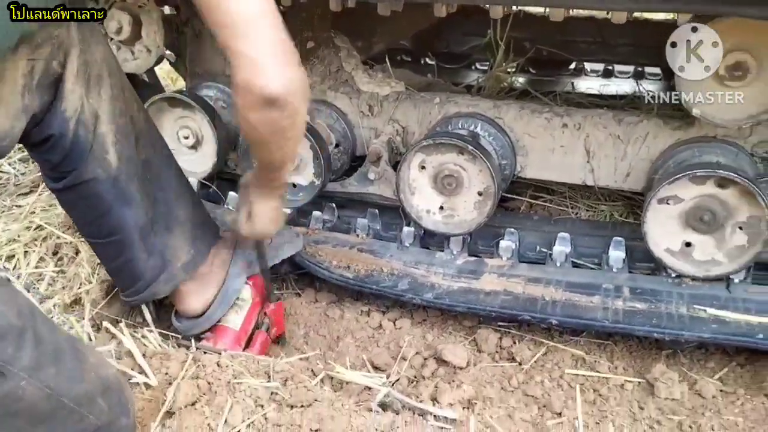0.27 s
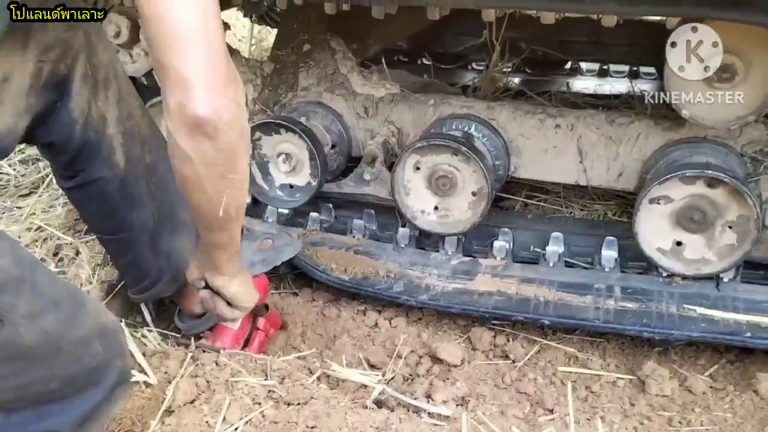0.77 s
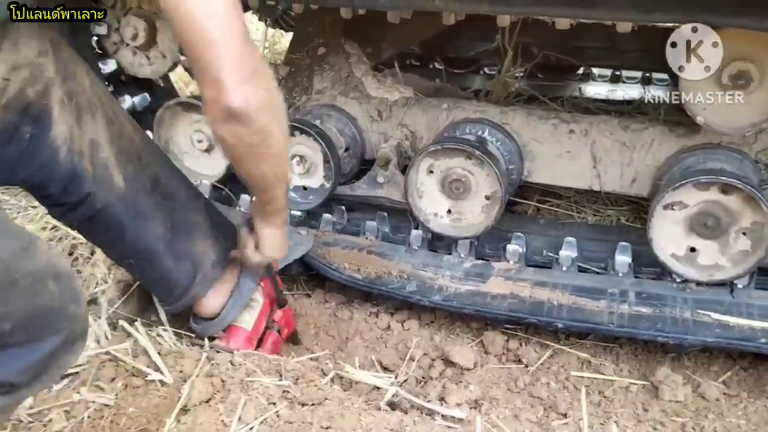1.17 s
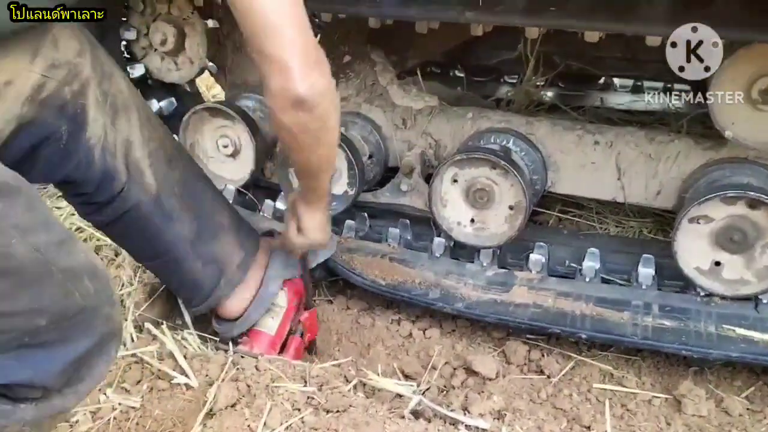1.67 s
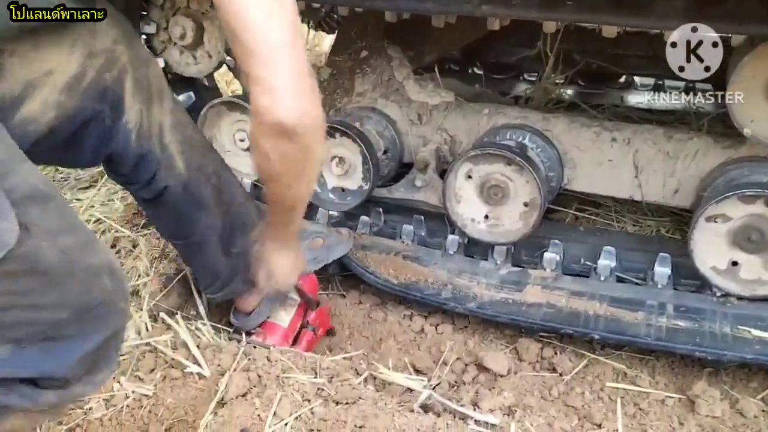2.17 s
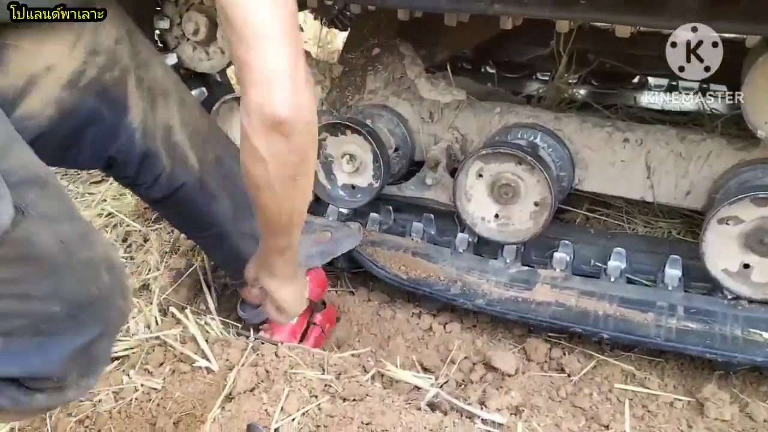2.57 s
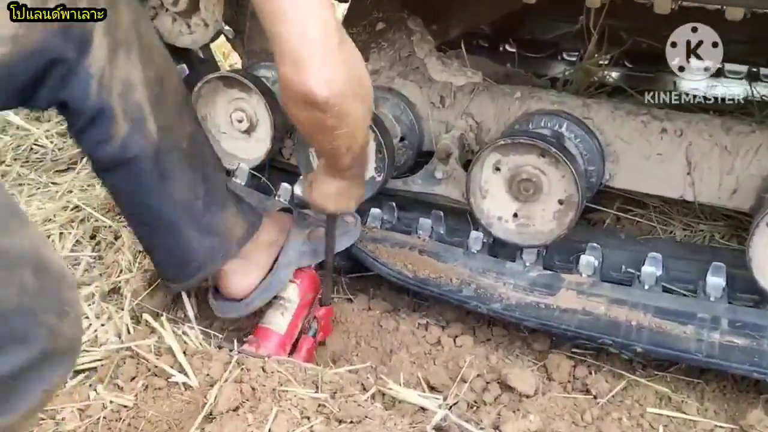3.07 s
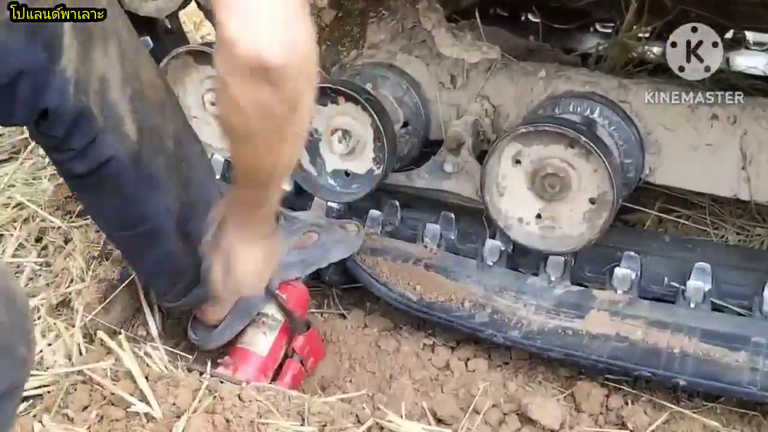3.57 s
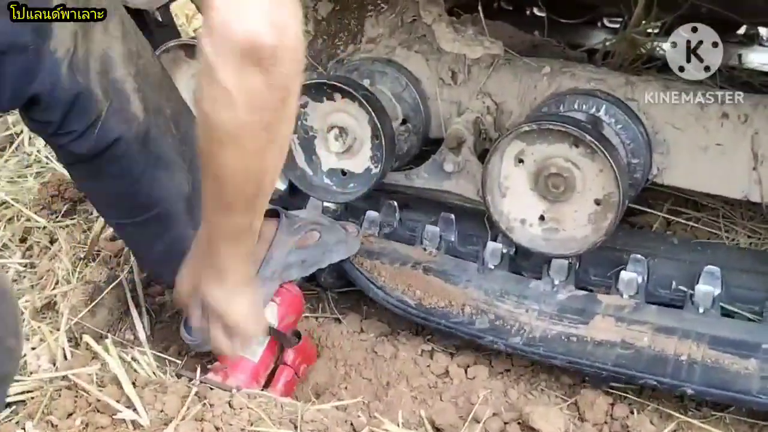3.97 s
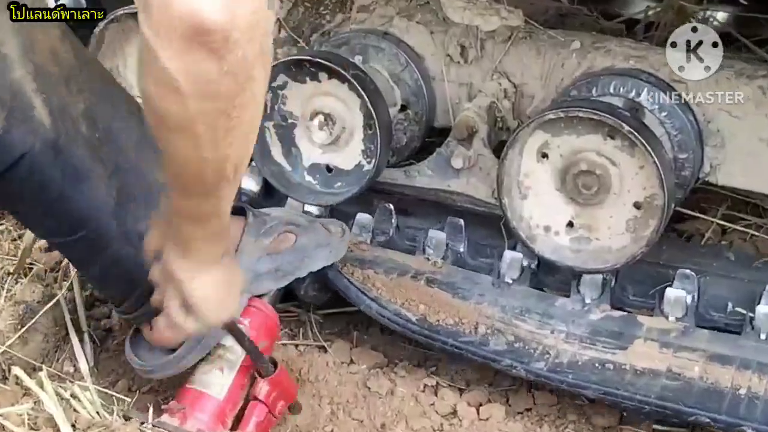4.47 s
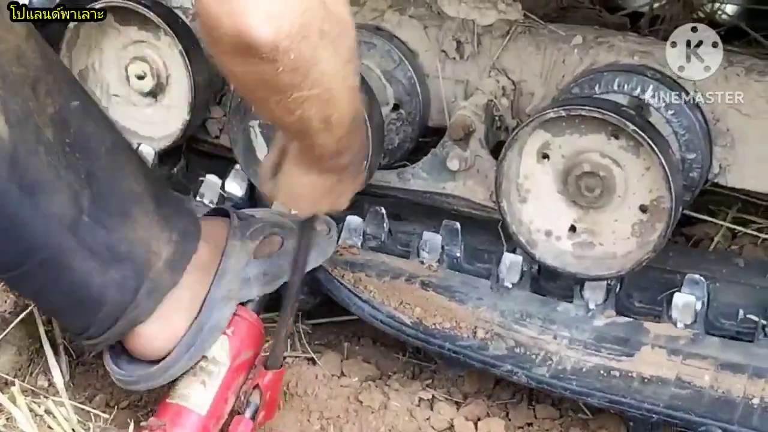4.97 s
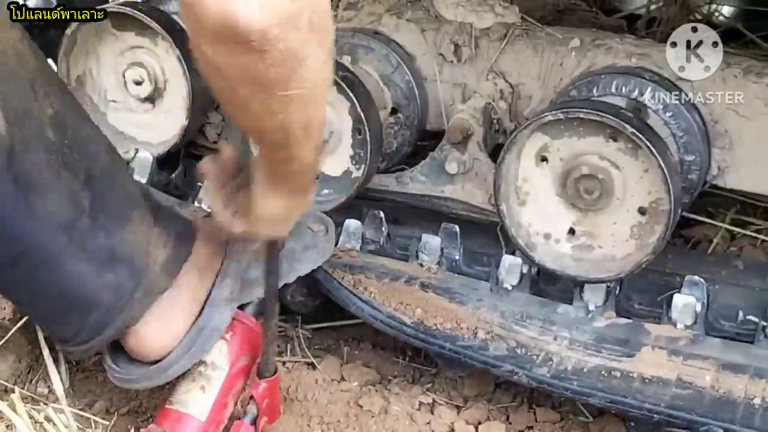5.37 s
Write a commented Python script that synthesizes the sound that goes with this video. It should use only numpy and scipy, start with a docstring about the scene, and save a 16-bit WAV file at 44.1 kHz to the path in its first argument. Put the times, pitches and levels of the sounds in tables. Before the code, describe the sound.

A hand-pumped jack rattles and clanks in quick uneven strokes outdoors, steel ringing briefly, pivot creaking softly, cloth and straw rustling.

```python
"""Steel rings, ticks and clacks at close range as a bottle jack is pumped by hand under a tracked farm machine.
Decaying bar modes, fed by chatter and a noise crack, make the handle; filtered noise and body modes make the stops.
Swept tones squeak, damped swings pop dully close to the microphone, and grainy noise rustles as clothes and straw.
Behind them lie shaped noise for the open field, a low, uneven rumble and two soil thumps; there is no room."""
import sys
import numpy as np
from scipy import signal
from scipy.fft import rfft, irfft, next_fast_len
from scipy.io import wavfile
from scipy.ndimage import uniform_filter1d

SR = 44100
rng = np.random.default_rng(int(sys.argv[2]) if len(sys.argv) > 2 else 0)


def master_out(mix):
    """Clip the mix to full scale and print it as 16-bit PCM to the path in sys.argv[1]."""
    frames = np.transpose(np.atleast_2d(mix))
    ceiling = np.clip(frames, -1, 1)
    pcm = np.round(ceiling * 32767).astype(np.int16)
    wavfile.write(sys.argv[1], SR, pcm)


N = 248283
TIME = np.arange(N) / SR
HIT = TIME[:SR // 4]  # time axis of one blow, s


def undb(db):
    """Decibels to gain."""
    return np.exp(np.asarray(db) * np.log(10) / 20)


def unit(x):
    """Scale to the energy of 10 ms at rms 1."""
    return x / np.sqrt(np.sum(x ** 2) / (SR / 100) + 1e-18)


def add(out, s, x):
    """Mix x into out from time s."""
    i = max(int(s * SR), 0)
    out[i:i + len(x)] += x[:max(len(out) - i, 0)]


def noise(points, size):
    """Noise of rms 1 with a spectrum of (f/Hz, level/dB) points."""
    hz, db = np.transpose(points)
    padded = next_fast_len(size)
    f = np.fft.rfftfreq(padded, 1 / SR) + 1
    gain = undb(np.interp(np.log(f), np.log(hz), db))
    gain = gain * f / (f + hz[0] / 2)  # fades out below the first point
    x = irfft(rfft(rng.standard_normal(padded)) * gain, padded)[:size]
    return x / x.std()


def walk(rate):
    """Smoothed random steps, rate per second, with a spread near 1."""
    k = max(int(SR / rate), 2)
    steps = np.repeat(rng.standard_normal(N // k + 1), k)
    return np.sqrt(2) * uniform_filter1d(steps, k)[:N]


def swell(s, db, length):
    """A smooth rise and fall around time s."""
    return undb(db) * np.exp(-((TIME - s) / length) ** 2)


def ring(modes, scatter_db, detune):
    """Decaying modes; grip and contact point change their pitch, strength and damping from blow to blow."""
    hz, db, t60 = np.transpose(modes)[:, :, None]
    pitch, strength, grip = rng.standard_normal((3, len(hz), 1))
    phase = 2 * np.pi * (hz * (1 + detune * pitch) * HIT + rng.random(hz.shape))
    decay_s = t60 * undb(np.tanh(grip))
    level_db = db + scatter_db * strength - 60 * HIT / decay_s
    return np.sum(undb(level_db) * np.sin(phase), axis=0)


def chatter(ms, rate):
    """A run of tiny rebounds that starts at once and dies away."""
    t = HIT[:len(HIT) // 4]
    taps = (rng.random(len(t)) < rate / SR) * rng.standard_normal(len(t))
    taps[0] = 0.31  # first touch
    return taps * np.exp(-(t / (ms / 1000)) ** 2)


FIRM_DB = -28.5  # blows above this level grow brighter, those below duller


def strike_point(x, levels_db):
    """Where the bar is struck sets how much energy each family of its modes takes."""
    edges = np.array([1300, 2700, 4800, 6600, 9500, 16000])  # family limits, Hz
    centres = [2000, 3600, 5800, 7400, 11000]  # Hz
    size = 2 * len(x)
    f, spectrum = np.fft.rfftfreq(size, 1 / SR), rfft(unit(x), size)
    power = np.abs(spectrum) ** 2 / (size * SR / 200)  # sums to about 1
    family_power = np.histogram(f, edges, weights=power)[0]
    force_db = np.mean(levels_db[1:])
    overtones_db = force_db - 12.5 + (force_db - FIRM_DB) / 2  # the highest modes grow faster than the force
    gain_db = np.append(levels_db, overtones_db) - 10 * np.log10(family_power)
    return irfft(spectrum * undb(np.interp(f, centres, gain_db)), size)[:len(x)]


STROKE_S = 0.39  # stroke length before the first landing and after the last


def stroke_share(s):
    """How far the stroke has come at time s: 0 on leaving the stop, 1 on landing again."""
    landings = [row[0] for row in STOPS]
    landings = [landings[0] - STROKE_S, *landings, landings[-1] + STROKE_S]
    return np.interp(s, landings, np.arange(len(landings))) % 1


# contact point travelling from lift (ring) through turn (thin tick) to push (fuller clack):
# [stroke share, level near 2 kHz/dB, level near 7.5 kHz/dB], both relative to the blow
CONTACT = [(0.21, -21.5, -21), (0.34, -19.5, -10.5), (0.56, -22.5, -4.5), (0.77, -14, -15.5)]


def colour(s, db, ping_db):
    """Levels of the bar's four lower mode families, from the blow and its place in the stroke."""
    shares, low, high = np.transpose(CONTACT)
    share = stroke_share(s)
    low_db, high_db = np.interp(share, shares, low), np.interp(share, shares, high)
    return db + np.array([low_db, min(-ping_db, 0), min(ping_db, 0), high_db])


# range of the partials of rattling pins and links: [lowest f/Hz, highest f/Hz]
LINK_HZ = (2477, 7860)
LINK_T60_S = 0.014  # before the scatter in grip


def links(count):
    """A few short partials of the loose linkage, different for every blow."""
    partials = [(hz, 0, LINK_T60_S) for hz in rng.uniform(*LINK_HZ, count)]
    return ring(partials, scatter_db=11.5, detune=0)


# handle hitting its socket as it is lifted, turned and pushed down:
# [t/s, base level/dB, 6 kHz ping over 4 kHz clack/dB, chatter/ms]
HANDLE_BLOWS = [(0.0516, -37.5, -9, 2.7), (0.22, -27.5, 11, 17), (0.243, -20.5, 6, 14),
                (0.322, -41.5, 3.5, 2), (0.405, -36.5, -16, 12), (0.4226, -25, -6, 4.7),
                (1.231, -40.5, -26, 30), (1.32, -38, -1.5, 4.6), (1.3678, -30.5, -1.5, 0.67),
                (1.5577, -29.5, -2.5, 2.4), (1.569, -24.5, -1.5, 2.6), (1.7485, -17.5, 6, 2.9),
                (1.873, -43.5, -7, 5.5), (1.9147, -25, -2.5, 3.6), (2.0632, -38.5, -6, 15),
                (2.087, -37.5, 8, 8.1), (2.106, -26, 8.5, 6.9), (2.195, -31, 7, 2.2),
                (2.267, -27.5, -4.5, 2.9), (2.4497, -24.5, 29, 9.9), (2.4648, -30, -4.5, 9.7),
                (2.531, -27.5, 7, 12.3), (2.606, -25, -3.5, 3.3), (2.8118, -32, -1, 3.6),
                (2.8842, -31, 12.5, 4.3), (2.967, -26.5, -7, 4.1), (3.1572, -30, 12, 11),
                (3.18, -25.5, 9.5, 0.54), (3.262, -43.5, 5, 1.1), (3.3302, -27.5, 4.5, 17),
                (3.5248, -32, -5.5, 5.9), (3.541, -23.5, 15, 10.6), (3.615, -27.5, 7.5, 2),
                (3.6903, -25.5, 2, 6.6), (3.86, -33, 13.5, 13), (3.895, -26.5, 2.5, 18),
                (3.987, -30, 11, 4.6), (4.056, -29.5, 1.5, 3.6), (4.0692, -35.5, -3, 5.8),
                (4.273, -35, -6, 4.9), (4.2961, -28, 8.5, 7.5), (4.4678, -30.5, 2, 3.2),
                (4.4778, -27, -2.5, 5.5), (4.627, -40, 21, 5.7), (4.667, -24, -6.5, 15),
                (4.8681, -29, 2, 7.9), (4.8852, -32, 1, 3.9), (5.0452, -26, 2, 7.6),
                (5.06, -21, 10.5, 15.8), (5.1325, -28, -17, 15.2), (5.223, -42, -15, 4.4),
                (5.2761, -39.5, -27, 15), (5.299, -50, -3, 4.9), (5.456, -26, 13, 19),
                (5.4766, -23.5, 3, 11)]
# hand-held steel bar and socket, before scatter: [f/Hz, relative level/dB, t60/s]
BAR_MODES = [(1902, -8, 0.025), (2870, -24.5, 0.11), (3617, 2, 0.039), (3787, -6, 0.028), (4180, -8, 0.018),
             (5954, 3, 0.036), (5810, 3.5, 0.0083), (7180, -2, 0.0066), (8600, -17, 0.042),
             (11845, -18.5, 0.037)]
# noise spectrum of the crack in a blow: [f/Hz, relative level/dB]
CLINK_CRACK = [(100, -28), (1500, -10), (3700, -5), (5000, -9), (7200, 11.5), (8300, -22), (9600, -53),
               (15500, -38)]
SEAT_S = 0.00084  # time constant of the bar biting into the socket
LINK_DB = -9.5  # linkage relative to the bar


def handle():
    """The bar chatters in the socket with its linkage; hand and contact damp it fast."""
    out = np.zeros(N)
    seating = 1 - np.exp(-HIT / SEAT_S)
    for s, db, ping_db, ms in HANDLE_BLOWS:
        bar = unit(ring(BAR_MODES, scatter_db=8.5, detune=0.012))
        steel = bar + undb(LINK_DB) * unit(links(count=7))
        modes = signal.fftconvolve(steel, chatter(ms, rate=1500))[:len(HIT)]
        crack = noise(CLINK_CRACK, len(HIT)) * np.exp(-HIT / 0.0067)
        blow = (unit(modes) + undb(-6.5) * unit(crack)) * seating
        add(out, s, strike_point(blow, colour(s, db, ping_db)))
    return out


# bending modes that sing on when the bar swings free: [f/Hz, relative level/dB, t60/s]
SINGING_MODES = [(3680, -26.5, 0.086), (5950, -26.5, 0.16)]
# bar dragging in its socket: [t/s, lower mode level/dB, upper mode over lower/dB]
SLIDES = [(0.295, -50, -12), (1.35, -46.5, -13), (2.163, -49, -7), (3.215, -54, -8), (3.477, -41, -33),
          (4.604, -48, -17), (4.777, -51.5, 2.5), (5.12, -50.5, 5)]
SLIDE_S = 0.014  # half length of a drag
SING_WAVER = 0.014  # pitch unsteadiness, share of the pitch


def singing():
    """Two modes of the bar sing on after a blow and swell when it drags; the moving socket keeps them rough."""
    out = 0
    for upper, (hz, mode_db, t60) in enumerate(SINGING_MODES):
        force = sum(swell(s, db + upper * upper_db, SLIDE_S) for s, db, upper_db in SLIDES)
        for s, db, ping_db, ms in HANDLE_BLOWS:
            looseness = ms / 7  # a loosely held bar both chatters and sings more
            level_db = colour(s, db, ping_db)[1 + upper] + mode_db
            add(force, s, looseness * undb(level_db - 60 * HIT / t60))
        phase = 2 * np.pi * np.cumsum(hz * (1 + SING_WAVER * walk(990))) / SR
        out = out + force * undb(2 * walk(200)) * np.sin(phase)
    return np.sqrt(2) * out


# uneven rubbing while the arm works, before its unrest: [t/s, level/dB]
RUB = [(.3, -62), (.6, -69.5), (1.4, -61), (3.5, -56.5), (4.4, -61)]


def effort_db():
    """Level of the rubbing as the arm works; the rattle follows it too."""
    return np.interp(TIME, *np.transpose(RUB))


RATTLE_DB = 4  # light touches relative to the rubbing


def rattle(count):
    """At random times the bar touches its socket lightly, which stirs only its first five listed modes."""
    out = np.zeros(N)
    for s in rng.random(count) * TIME[-1]:
        bar = ring(BAR_MODES[:5], scatter_db=9, detune=0.016)
        touch = signal.fftconvolve(bar, chatter(13.4, rate=2100))
        add(out, s, undb(2 * rng.standard_normal()) * unit(touch))
    return out * undb(effort_db() + RATTLE_DB)


def contact(ms, rise_s, tail_db, tail_s):
    """Envelope of steel grinding on steel, with a weaker tail scattered from the machine."""
    rise = 1 - np.exp(-HIT / rise_s)
    grind = np.exp(-(HIT / (ms / 1000)) ** 2)
    return rise * (grind + undb(tail_db) * np.exp(-HIT / tail_s))


# lever landing on its stop, which ends one pump stroke and starts the next: [t/s, clack level/dB]
STOPS = [(0.1336, -29.5), (0.4951, -27.5), (1.6247, -25), (2.004, -35.5), (2.345, -30), (2.694, -29.5),
         (3.0523, -26), (3.419, -28), (3.7726, -25), (4.151, -28), (4.5503, -30), (4.957, -33.5),
         (5.3708, -31)]
# jack body and pump lever, before scatter: [f/Hz, relative level/dB, t60/s]
BODY_MODES = [(185.6, -14.5, 0.049), (521.5, -13.5, 0.065)]
# noise spectrum of the landing: [f/Hz, relative level/dB]
STOP_CRACK = [(100, -5), (800, 3), (2900, 2.5), (3400, 13), (4400, 11.5), (6400, -1), (7400, 3.5),
              (9500, -28.5), (13500, -24.5)]
THUD_DB = -6.5  # hollow thud relative to the clack


def stops():
    """The lever lands on the jack body: a clack, a short hollow thud, and a shudder in the soil."""
    out = np.zeros(N)
    below, above = (signal.butter(3, 1500, side, fs=SR, output="sos") for side in ("low", "high"))
    for s, db in STOPS:
        modes = unit(ring(BODY_MODES, scatter_db=4.5, detune=0.0032) * (1 - np.exp(-HIT / 0.0048)))
        clack = noise(STOP_CRACK, len(HIT)) * contact(4.06, rise_s=0.0077, tail_db=-7.5, tail_s=0.0048)
        thud = noise(STOP_CRACK, len(HIT)) * contact(11.5, rise_s=0.00047, tail_db=-7.5, tail_s=0.017)
        hollow = unit(thud) + undb(-15.5) * modes
        shudder = noise(SOIL, len(HIT)) * np.sin(np.pi * HIT / HIT[-1]) * np.exp(-HIT / 0.079)
        add(out, s, undb(db) * unit(signal.sosfilt(above, clack)))
        add(out, s, undb(db + THUD_DB) * unit(signal.sosfilt(below, hollow)))
        add(out, s, undb(-51.5) * shudder)
    return out


# squeaks and creaks of the pivot: [t/s, level/dB, f/Hz, half length/s, glide/octaves per half length]
SQUEAKS = [(0.856, -48, 910, 0.015, 0), (1.55, -48.5, 709, 0.025, 0), (3.452, -51, 932, 0.027, -0.016),
           (3.611, -49, 860, 0.023, 0.02), (3.802, -58, 881, 0.026, 0.06),
           (4.545, -47, 1670, 0.0093, -0.095), (5.108, -48.5, 1320, 0.0055, 0.086),
           (5.337, -52.5, 1550, 0.022, -0.069)]
SQUEAK_WAVER = 0.06  # pitch unsteadiness, share of the pitch


def squeaks():
    """The dry pivot sticks and slips: a brief rasping tone with a weak octave."""
    waver, rasp, out = 1 + SQUEAK_WAVER * walk(1500), undb(3.9 * walk(620)), 0
    for s, db, hz, length, glide in SQUEAKS:
        pitch = waver * hz * 2 ** (glide * np.clip((TIME - s) / length, -2, 2))
        phase = 2 * np.pi * np.cumsum(pitch) / SR
        tone = np.sin(phase) + undb(-19.0) * np.sin(2 * phase)
        out = out + swell(s, db, length) * tone
    return np.sqrt(2) * rasp * out


# dull pops close to the microphone, before the bass cut: [t/s, swing peak level/dB, f/Hz, tick peak level/dB]
POPS = [(0.952, -35.5, 195, -33), (1.4608, -16, 690, -18), (1.6285, -27.5, 225, -51),
        (1.6737, -29, 710, -63), (2.007, -24, 866, -31), (2.028, -27.5, 794, -45),
        (2.1228, -27.5, 840, -29), (2.437, -20.5, 720, -46), (2.45, -19, 770, -21.5),
        (2.4581, -17.5, 734, -26), (2.5711, -12, 760, -13), (2.991, -14, 720, -30),
        (4.1925, -16.5, 736, -29), (4.2004, -23, 454, -44)]
POP_LOW_HZ = 148  # the pops carry little below this


def pops():
    """Each pop is a swing or two of a heavily damped resonance with a short, ragged tail and a tick, often faint."""
    out = np.zeros(N)
    for s, db, hz, tick_db in POPS:
        cycles = hz * HIT
        envelope = np.exp(-((cycles - .62) / 0.49) ** 2) + 0.15 * cycles * np.exp(1 - cycles / 0.92)
        swing = -np.sin(2 * np.pi * cycles) * envelope
        band = signal.butter(2, [hz / 2, hz * 1.48], "band", fs=SR, output="sos")
        tail = signal.sosfilt(band, rng.standard_normal(len(HIT))) * np.exp(-HIT / 0.011)
        tick = noise(SCUFF_SPECTRUM, len(HIT)) * np.exp(-HIT / 0.0014)
        add(out, s, undb(db) * (swing / np.abs(swing).max() + undb(-10) * tail))
        add(out, s, undb(tick_db) * tick / np.abs(tick).max())
    return signal.sosfilt(signal.butter(1, POP_LOW_HZ, "high", fs=SR, output="sos"), out)


# trouser cloth brushing over straw: [t/s, level/dB]
RUSTLE = [(.68, -67), (.76, -47.5), (.81, -57.5), (.848, -37), (.88, -51.5), (1.08, -76), (1.13, -49),
          (1.17, -62.5)]
# scuffs of sandal and sleeve: [t/s, level/dB, half length/s]
SCUFFS = [(0.851, -37.5, 0.007), (1.456, -42, 0.0063), (1.56, -45, 0.028), (2.573, -38, 0.0046),
          (2.983, -46, 0.0099), (4.169, -49.5, 0.047), (5.332, -57.5, 0.033)]
# stalks of straw snapping: [t/s, level/dB]
SNAPS = [(1.045, -45.5), (1.162, -46)]
# noise spectra of cloth and of scuffs: [f/Hz, relative level/dB]
CLOTH_SPECTRUM = [(200, -14), (900, -3), (2400, -3.5), (4100, 1.5), (5200, -4), (7200, -1.5), (9700, -26.5),
                  (12500, -12.5)]
SCUFF_SPECTRUM = [(300, -23), (950, -2.5), (2600, -4), (4200, -7), (10000, -31.5)]
RUB_UNREST_DB = 6  # the rubbing catches and eases


def clothes():
    """Fibres and straw catch and slip, so the rubbing is grainy and the scuffs more so; two stalks snap."""
    brush = undb(np.interp(TIME, *np.transpose(RUSTLE), left=-np.inf, right=-np.inf))
    rub = undb(effort_db() + RUB_UNREST_DB * np.tanh(walk(20)))
    scuff = noise(SCUFF_SPECTRUM, N) * sum(swell(*row) for row in SCUFFS) * undb(2.6 * walk(500))
    cloth = noise(CLOTH_SPECTRUM, N) * np.hypot(brush, rub)
    out = (cloth + scuff) * undb(2 * walk(500))
    for s, db in SNAPS:
        add(out, s, undb(db) * noise(CLOTH_SPECTRUM, len(HIT)) * np.exp(-HIT / 0.0019))
    return out


# noise spectra of open air and of soil: [f/Hz, relative level/dB]
FIELD = [(40, -71), (115, 11), (800, -1), (4000, -18), (9500, -41)]
SOIL = [(35, 4.5), (110, 9.5), (700, -48)]
# low rumble, before its unrest: [t/s, level/dB]
RUMBLE = [(1.3, -75), (2.5, -64.5), (3.7, -66.5), (4.0, -70)]
# low soft thumps in the soil just after two of the landings: [t/s, level/dB]
SOIL_THUMPS = [(0.57, -55.5), (1.69, -49)]
THUMP_S = 0.027  # half length of a thump
FIELD_DB = -63.5  # open air, before its unrest


def field():
    """Quiet open air with a low, uneven rumble and two low soil thumps."""
    unrest_db = 3.5 * np.tanh(walk(11))
    rumble = undb(np.interp(TIME, *np.transpose(RUMBLE)) + unrest_db)
    thumps = sum(swell(s, db, THUMP_S) for s, db in SOIL_THUMPS)
    air = noise(FIELD, N) * undb(FIELD_DB + unrest_db / 2)
    return air + noise(SOIL, N) * (rumble + thumps)


def scene():
    """All sources at one microphone."""
    steel = handle() + singing() + rattle(count=60) + stops()
    return (steel + squeaks() + pops() + clothes() + field())[None]


TOP_HZ = 15600  # upper edge of the passband


def record(dry):
    """The recorder thins the deepest bass and cuts the top."""
    thinned = signal.sosfilt(signal.butter(2, 42, "high", fs=SR, output="sos"), dry)
    return signal.sosfilt(signal.ellip(8, .2, 70, TOP_HZ, fs=SR, output="sos"), thinned)


dry = scene()
out = record(dry)
master_out(out)
```